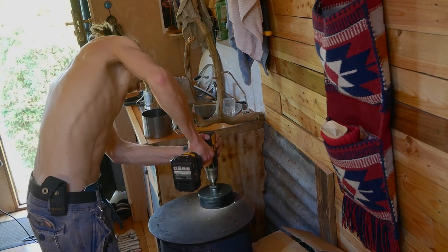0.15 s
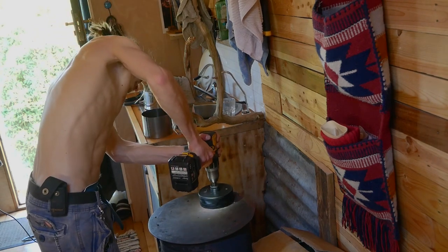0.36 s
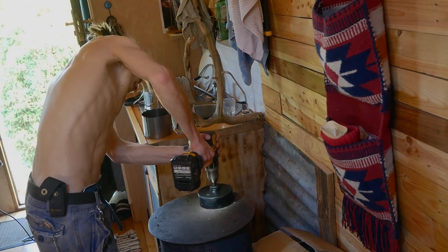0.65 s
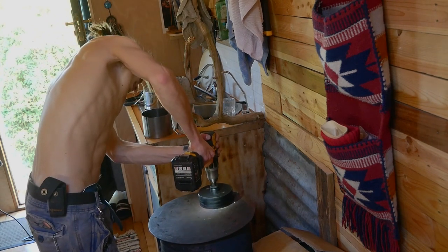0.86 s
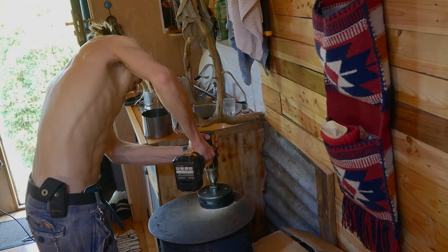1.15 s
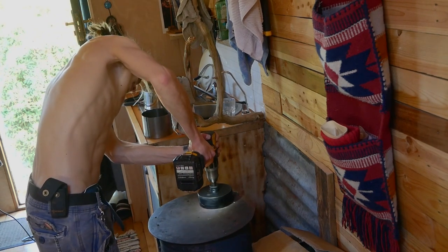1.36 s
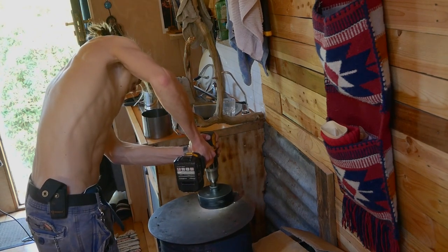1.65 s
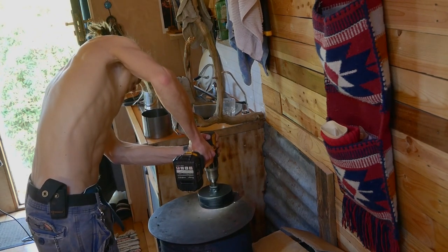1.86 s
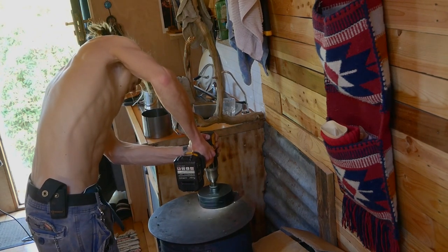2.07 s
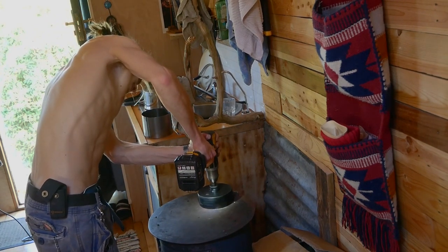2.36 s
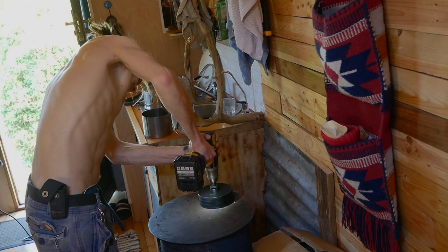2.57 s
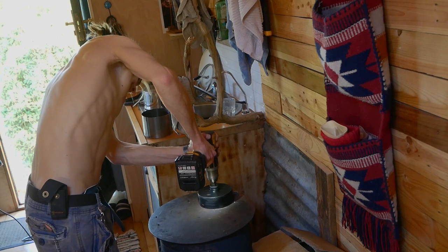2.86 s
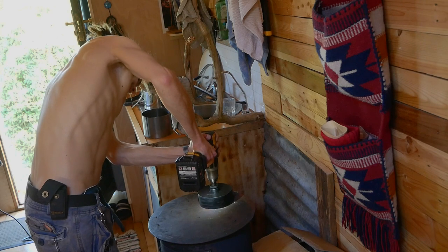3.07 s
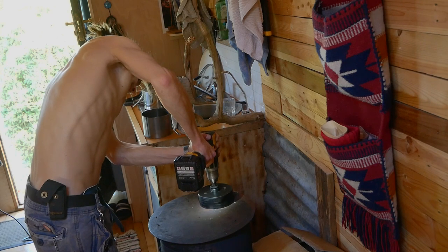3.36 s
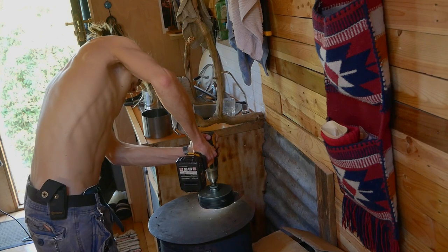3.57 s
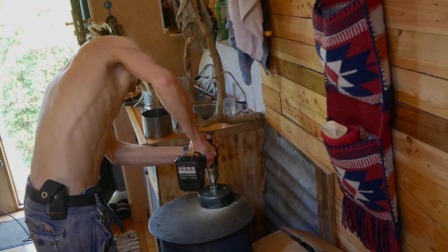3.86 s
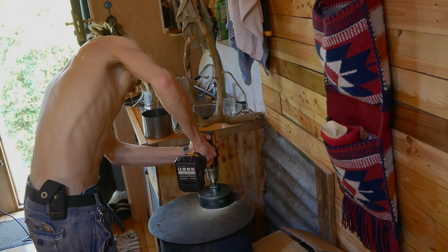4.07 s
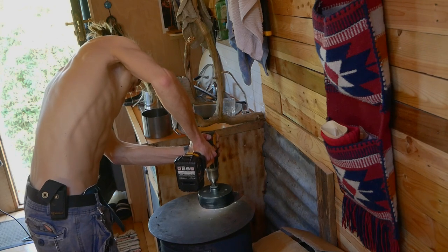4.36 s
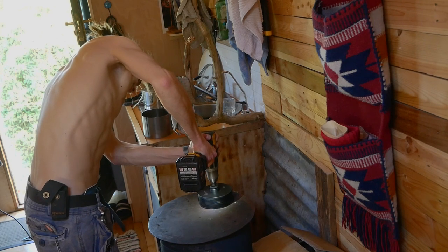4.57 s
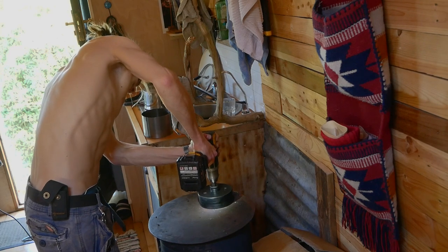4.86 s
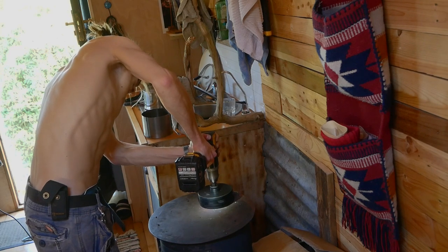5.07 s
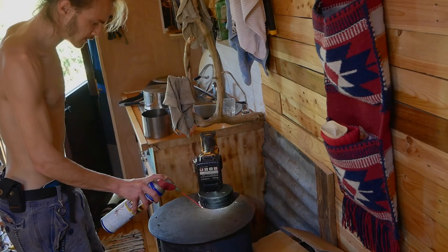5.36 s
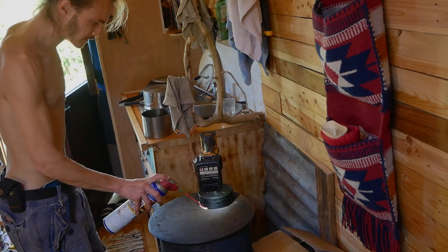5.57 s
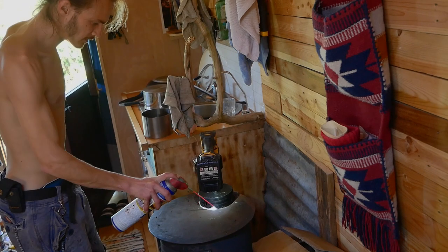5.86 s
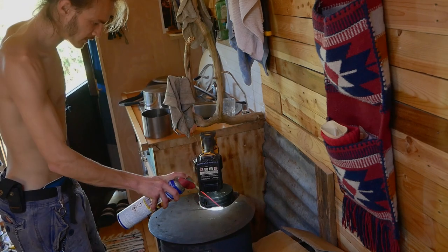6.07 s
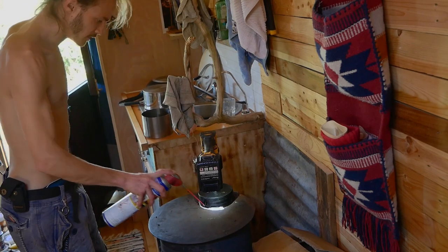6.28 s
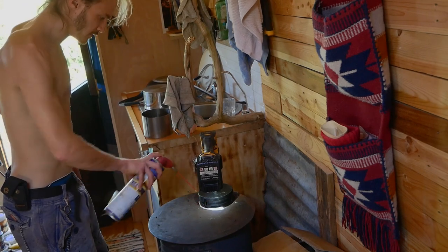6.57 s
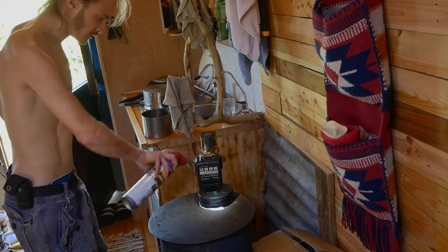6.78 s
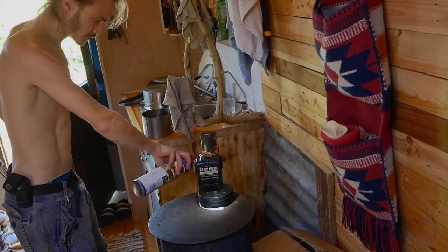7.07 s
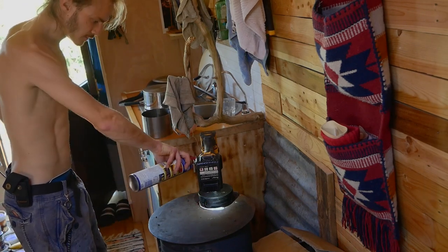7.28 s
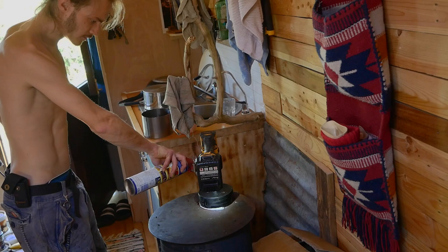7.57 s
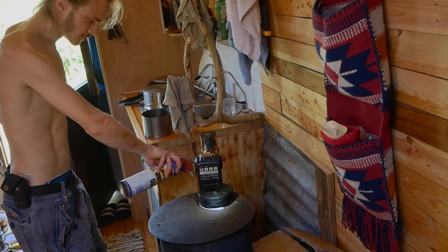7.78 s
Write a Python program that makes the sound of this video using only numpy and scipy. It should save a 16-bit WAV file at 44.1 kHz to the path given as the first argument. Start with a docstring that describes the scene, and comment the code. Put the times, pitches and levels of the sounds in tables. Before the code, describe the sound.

A cordless drill's hole saw grinds loudly through a steel stove top, squealing and chattering, then cuts abruptly to quiet spray hiss and small can clinks.

```python
"""Hole saw in a stove top, then a spray can

A cordless drill drives a hole saw into a steel stove top in a small wooden van. Uneven grains of noise are
the biting teeth; filters make the plate ring, the chips hiss and the stove boom, and single modes squeal.
The scene then jumps to the quiet van: shaped noise makes rumble, air, hand rustle and a dying spray, while
short scrapes ring the modes of an oil spray can as a hand handles it against the saw."""
import sys
import numpy as np
from scipy import signal
from scipy.fft import rfft, irfft, next_fast_len
from scipy.io import wavfile
from scipy.ndimage import uniform_filter1d, map_coordinates

SR = 44100
rng = np.random.default_rng(int(sys.argv[2]) if len(sys.argv) > 2 else 0)


def wav_out(sig):
    """Save sig, one row per channel (or a flat mono array), as 16-bit PCM at SR to the path in sys.argv[1]."""
    wavfile.write(sys.argv[1], SR, np.round(np.clip(np.atleast_2d(sig).T, -1, 1) * 32767).astype(np.int16))


N = 349139
TIME_S = np.arange(N) / SR
JUMP_S = 5.231  # from the drilling to the quiet van

# Modes of the thin can before the hand damps them: (pitch_hz, width_hz, level_db)
CAN_MODES = [(1810, 55, -9), (1980, 70, -7), (2260, 60, -8), (2500, 50, -8), (2910, 45, -4), (3040, 25, 0),
             (3725, 28, -1), (4500, 45, -4), (4750, 53, -8), (5600, 35, -7), (6780, 25, -7),
             (7910, 20, -10), (8110, 24, -7), (9310, 35, -7), (11300, 60, -8), (12600, 90, -8)]
# Broad sound of the steel plate: (pitch_hz, level_db per Hz)
PLATE_SLOPE = [(160, -48), (280, -9), (806, -12.5), (874, -8.5), (1210, -5), (1660, -5), (4500, -16),
               (5850, -46.5), (9900, -120)]
# Ringing modes of the plate, standing on that slope: (pitch_hz, width_hz, level_db)
PLATE_MODES = [(345, 22, 8), (388, 18, 11), (460, 24, 7.5), (510, 18, 8), (581, 20, 11.5), (636, 18, 13),
               (713, 24, 12), (795, 30, 5), (880, 18, 15), (1014, 26, 8), (1187, 20, 6), (1245, 26, 5.5),
               (1330, 170, 3.5), (1500, 36, 6), (1574, 18, 7), (1795, 45, 6), (1962, 36, 6), (2160, 50, 8),
               (2280, 45, 6.5), (2335, 22, 8.5), (2525, 60, 5), (2605, 35, 6), (2820, 45, 4), (2970, 60, 5),
               (3058, 29, 8), (3215, 90, 5)]
# Hiss of the metal chips: (pitch_hz, level_db per Hz)
CHIP_SLOPE = [(2240, -25.5), (3800, -0.5), (4620, -1), (6200, -7), (9590, -10), (12600, -21.5),
              (15200, -26.5), (15700, -38)]
# Ringing modes of the saw cup, standing on that hiss: (pitch_hz, width_hz, level_db)
CUP_MODES = [(4600, 610, 1), (7240, 620, 1.5), (9460, 190, 1.5), (11360, 390, 4.5), (12240, 360, 6.5)]
# Drum-like sound of the stove body: (pitch_hz, level_db per Hz)
DRUM_SLOPE = [(70, -42), (95, -7), (130, -1), (152, 4.5), (180, -1.5), (260, -6.5), (380, -12.5),
              (520, -41)]


def amp(db):
    """Turn decibels into a plain gain."""
    return 10 ** (np.asarray(db) / 20)


def unit(x):
    """Scale a signal to an RMS of one."""
    return x / np.sqrt(np.mean(x ** 2) + 1e-20)


def along(points, hz):
    """Read a curve of (pitch_hz, value) points on a logarithmic pitch axis."""
    f, v = np.transpose(points)
    return np.interp(np.log(hz + 1), np.log(f + 1), v)


def curves(rows):
    """Draw each column after the time as a curve with one value per sample."""
    s, *cols = np.transpose(rows)
    return [np.interp(TIME_S, s, c) for c in cols]


def wobble(rate):
    """Make a smooth random curve with rate knots a second."""
    knots = rng.standard_normal(int(N * rate / SR) + 4)
    return map_coordinates(knots, [np.arange(N) * rate / SR])


def coloured(x, gain):
    """Filter x to a gain over pitch, causally: nothing sounds before its cause."""
    m = 2 * next_fast_len(N // 2 + 8192)
    cep = irfft(np.log(gain(np.fft.rfftfreq(m, 1 / SR)) + 1e-6), m)
    # folding the cepstrum forward gives the filter its minimum phase
    cep[1:m // 2] *= 2
    cep[m // 2 + 1:] = 0
    return irfft(rfft(x, m) * np.exp(rfft(cep)), m)[..., :N]


def body(slope, modes=()):
    """Give the gain of a broad spectrum with resonant peaks standing on it."""
    def peaks(hz):
        return sum(amp(2 * db) / (1 + (2 * (hz - c) / w) ** 2) for c, w, db in modes)
    return lambda hz: amp(along(slope, hz)) * np.sqrt(1 + peaks(hz))


def noise():
    """Make plain white noise."""
    return rng.standard_normal(N)


def grains(rate, spread_db, hiss):
    """Make random impacts of uneven size, rate a second, over a share of smooth hiss."""
    sizes = amp(spread_db * rng.exponential(size=N))
    hits = (rng.random(N) < rate / SR) * noise() * sizes
    return unit(hits) + hiss * noise()


def narrow(hz, width_hz):
    """Keep a mode ringing with random pushes: a tone of wandering size and phase."""
    turns = np.exp(2j * np.pi * np.cumsum(hz * np.ones(N)) / SR)
    swing = (wobble(width_hz) + 1j * wobble(width_hz)) * turns
    return unit(swing.real)


def patchy(x, depth_db, size=256, count=12):
    """Vary the gain in patches of time and pitch; a larger size makes them narrower in pitch."""
    z = signal.stft(x, nperseg=size)[2]
    field = uniform_filter1d(rng.standard_normal(z.shape), size=4, axis=0)
    field = uniform_filter1d(field, size=count, axis=1)
    return signal.istft(z * amp(depth_db * unit(field)), nperseg=size)[1][:N]


def van_background():
    """Shape noise into low rumble, wavering hum from outside, still air and a faint airy whistle."""
    # low rumble: (pitch_hz, level_db per Hz)
    rumble_slope = [(15, -4.5), (30, 0.5), (55, -1.5), (70, -9.5), (120, -8.5), (326, -19.5), (1200, -31),
                    (1800, -59)]
    # wavering hum: (pitch_hz, width_hz, level_db)
    hum_tones = [(95.5, 10, -53), (151, 12, -66)]
    # still air: (pitch_hz, level_db per Hz)
    air_slope = [(180, -15), (300, -2), (1120, -8), (1440, -4), (1730, -8.5), (15600, -29)]
    # one airy tone: middle_s, length_s, pitch_hz, level_db
    whistle_tone = (6.58, .16, 1460, -66)
    rumble = amp(-49.5 + 1.25 * wobble(4)) * unit(coloured(noise(), body(rumble_slope)))
    hum = sum(amp(db) * narrow(hz, width) for hz, width, db in hum_tones)
    air = amp(-64) * unit(coloured(noise(), body(air_slope)))
    middle_s, length_s, hz, db = whistle_tone
    swell = np.exp(-((TIME_S - middle_s) / length_s) ** 2)
    whistle = amp(db) * swell * narrow(hz, width_hz=250)
    return rumble + hum + air + whistle


def thud():
    """Step softly on the floor: one low push through the boards with two quicker overtones."""
    # the step: start_s, pitch_hz, lowest tone's unscaled 60 dB fade_s, level_db before overtone scaling
    step = (5.385, 48, .3, -43)
    start_s, hz, fade_s, db = step
    t = np.maximum(TIME_S - start_s, 0)
    tones = 0
    for k in (1, 3.1, 5.2):
        fade = amp(-60 * t * k ** 0.46 / fade_s - 1.8 * k)
        tones = tones + fade * np.sin(2 * np.pi * k * hz * t)
    return amp(db) * tones


def spray():
    """Hiss out of the nozzle, ring the can faintly, sink in pitch and die away after the jump."""
    # hiss of the jet: (pitch_hz, level_db per Hz)
    jet_slope = [(1800, -29), (3500, -2), (6000, 1), (9500, -2.5), (15600, -10.5)]
    # airy nozzle note: pitch_hz at the jump, sinking_hz per s, width_hz, level_db against the spray
    nozzle_note = (9400, 2100, 700, -12)
    start_db, fade_db_per_s = -52, 15
    spray_db = start_db - fade_db_per_s * np.maximum(TIME_S - JUMP_S, 0)
    jet_modes = [(hz, width, db + 9) for hz, width, db in CAN_MODES]
    jet = amp(spray_db) * unit(coloured(noise(), body(jet_slope, jet_modes)))
    note_hz, sinks, width, note_db = nozzle_note
    note = amp(spray_db + note_db) * narrow(note_hz - sinks * (TIME_S - JUMP_S), width)
    return jet + note


def rustle():
    """Rub a hand over the can: patchy grains colour themselves through its damped modes."""
    # strength of the rub, for its low and its treble part alike: (start_s, level_db)
    hand_level = [(5.24, -55.5), (5.5, -62.5), (5.68, -54), (5.75, -67.5), (5.83, -54.5), (5.92, -67.5),
                  (6.15, -62), (6.4, -69.5), (6.8, -69.5), (7.1, -62.5), (7.55, -68), (7.66, -58.5),
                  (7.75, -59), (7.92, -46.5)]
    # colour of the rub: (pitch_hz, level_db per Hz)
    rub_slope = [(600, -19.5), (1000, -10), (1500, -17.5), (2100, -4.5), (2500, -12.5), (4500, -3),
                 (6000, -8.5), (7800, -6.5), (10000, -11.5), (15600, -16)]
    rustle_db, = curves(hand_level)
    # the hand that holds the can widens its modes
    held_modes = [(hz, 1.5 * width, db + 5) for hz, width, db in CAN_MODES]
    rub = patchy(grains(3000, spread_db=1.2, hiss=1.0), depth_db=3.5)
    rub = coloured(rub, body(rub_slope, held_modes))
    low = coloured(rub, lambda hz: 1 / np.sqrt(1 + (hz / 4000) ** 6))
    return amp(rustle_db) * (unit(low) + unit(rub - low))


def can():
    """Touch metal with can and straw: each short scrape also rings the can's modes at new strengths."""
    # touches, levels before colouring: (start_s, level_db, rise_ms, ring_db against scrape, strongest_hz)
    touches = [(5.292, -35.5, 1.7, -3, 1980), (5.31, -53.5, 3, -7.5, 2980), (6.079, -44, 1, -12, 2000),
               (6.118, -47.5, 1, -7, 4900), (6.231, -37, 0.54, -7, 2010), (6.254, -43, 1.3, 5.5, 9300),
               (6.34, -49, 1.1, -10, 4500), (6.408, -34, 0.27, -8, 4660), (6.68, -51, 8, -9, 4470),
               (6.955, -47, 12, -13, 5400), (7.04, -55.5, 12, -1, 8000), (7.058, -46.5, 9.1, -3, 3750),
               (7.075, -45.5, 11, -3, 2400), (7.085, -60.5, 14, 4, 7600), (7.095, -51, 7.3, -10, 2000),
               (7.19, -48, 8, -16, 1900), (7.25, -48, 5, -16, 2000), (7.275, -49, 8, -10, 1850),
               (7.362, -47, 2.2, -13, 2470), (7.6, -37, 4.3, -10, 4500), (7.625, -43, 7.1, -14, 3000),
               (7.78, -36, .6, -2, 1900), (7.799, -38.5, .8, -3.5, 2900), (7.823, -41.5, 1, -4.5, 5000),
               (7.848, -39.5, .6, -5, 1900), (7.88, -39.5, .6, 0.5, 4500), (7.902, -44.5, 4, -0.5, 3100)]
    # colour of the scrape itself: (pitch_hz, level_db per Hz)
    scrape_slope = [(410, -38), (700, -9), (1260, -4.5), (1880, -3.5), (4650, -12.5), (8570, -12),
                    (13000, -21), (15600, -26)]
    shortest_fade_s, slow_tails = 0.089, 6  # the 60 dB fade grows by this many rise times
    brightens_db = 1.5  # tilt per octave, for each octave of the strongest pitch
    grip = 0.5  # the fingers widen each mode by up to this share
    ring_dulls_db = 3.5  # per octave: the hand damps the high modes
    slide_frees_db = 0.3  # per ms of rise: a slide frees the high modes and hisses less
    out, t = np.zeros(N + SR), np.arange(SR // 3) / SR
    hz = np.fft.rfftfreq(len(t), 1 / SR)
    grit = unit(np.resize(grains(6000, spread_db=0.7, hiss=1.4), N + SR))
    for start_s, db, rise_ms, ring_db, spot_hz in touches:
        start, rise_s = round(start_s * SR), rise_ms / 1000
        fade_s = shortest_fade_s + slow_tails * rise_s
        fade = amp(db - 60 * np.maximum(t - rise_s, 0) / fade_s)
        attack = np.minimum(t / rise_s, 1)
        scrape = rfft(fade * attack * grit[start:][:len(t)], len(t))
        modes = 0
        for c, width, level_db in CAN_MODES:
            dull_db = (ring_dulls_db - slide_frees_db * rise_ms) * np.log2(c / 3000)
            strength = amp(level_db + rng.normal(0, 1.9) - dull_db)
            held_width = width * (1 + grip * rng.random())
            modes = modes + strength * 1j * hz * width / (c * c - hz * hz + 1j * hz * held_width)
        # where the can is touched favours one band
        spot = np.exp(-(np.log2((hz + 100) / spot_hz) / 0.2) ** 2)
        bright_db = brightens_db * np.log2(spot_hz / 3200)
        tilt = amp(bright_db * np.log2((hz + 100) / 3000) + 5.1 * spot)
        direct = amp(along(scrape_slope, hz) - slide_frees_db * rise_ms * (0.5 - spot))
        ring = amp(ring_db + 9.5 + 2.9 * spot) * modes
        out[start:][:len(t)] += irfft(scrape * tilt * (direct + ring), len(t))
    return out[:N]


def catches():
    """Let a caught tooth go: a short burst through the plate, the saw cup and the stove drum."""
    # caught teeth, levels before lift and filters: (start_s, level_db, saw cup level_db against plate)
    caught_teeth = [(0.0744, -12.5, -19.5), (0.097, -15, -4.5), (0.5139, -1.5, -44), (0.9091, -10, -15.5),
                    (1.2102, -6.5, -7), (4.124, -19, -15), (4.5228, -7, -13.5), (5.126, -4.5, -14.5)]
    fade_s = 0.045  # time to fall 60 dB
    low, high, t = np.zeros(N + SR), np.zeros(N + SR), np.arange(SR // 10) / SR
    for start_s, db, cup_db in caught_teeth:
        start = round(start_s * SR)
        burst = amp(db + 5.5 - 60 * t / fade_s) * rng.standard_normal(len(t))
        low[start:][:len(t)] += burst
        high[start:][:len(t)] += amp(cup_db) * burst
    plate, drum = body(PLATE_SLOPE, PLATE_MODES), body(DRUM_SLOPE)
    stove = coloured(low[:N], lambda hz: plate(hz) + amp(-5) * drum(hz))
    return stove + coloured(high[:N], body(CHIP_SLOPE, CUP_MODES))


def squeals():
    """Bind the saw so one plate mode sings: a quick swell, sinking as the saw drags, part tone, part rasp."""
    # single squeals: (middle_s, length_s, pitch_hz at the middle before drift, level_db)
    squeal_list = [(0.098, 0.007, 4430, -10.5), (0.144, 0.045, 907, -19.5), (0.294, 0.057, 252, -21.5),
                   (0.69, 0.04, 1200, -19), (0.737, 0.05, 1220, -18.5), (0.93, 0.06, 1210, -20.5),
                   (1.19, .04, 1200, -24), (0.845, 0.05, 254, -17.5), (1.395, 0.042, 1212, -19),
                   (1.533, 0.045, 276, -17), (1.624, 0.035, 1224, -20.5), (1.758, 0.057, 1182, -20.5),
                   (1.841, 0.043, 882, -22), (2.099, 0.038, 897, -17), (2.403, 0.046, 1246, -15),
                   (2.499, 0.04, 1240, -21.5), (2.6, 0.05, 882, -20.5), (2.616, 0.035, 1200, -21.5),
                   (2.743, 0.045, 880, -19), (2.834, 0.06, 1240, -25), (2.957, 0.04, 418.5, -17),
                   (2.99, 0.052, 341, -18.5), (3.178, 0.034, 1225, -22), (3.439, 0.055, 1179, -17),
                   (3.71, 0.035, 1195, -16.5), (3.927, 0.06, 1220, -17), (4.146, 0.038, 890, -17),
                   (4.391, 0.034, 434, -16.5), (4.422, 0.031, 1173, -13.5), (4.524, 0.022, 1307, -14),
                   (4.684, 0.033, 1180, -17.5), (4.721, 0.03, 412, -19.5), (4.887, 0.09, 1264, -13)]
    out, drift = np.zeros(N), 0.01 * wobble(40)
    slow_rasp = 0.6 * (wobble(70) + 1j * wobble(70))
    fast_rasp = 0.45 * (wobble(260) + 1j * wobble(260))
    rasp = 1 + slow_rasp + fast_rasp
    for middle_s, length_s, hz, db in squeal_list:
        first = max(round((middle_s - length_s) * SR), 0)
        span = slice(first, round((middle_s + 1.5 * length_s) * SR))
        u = (TIME_S[span] - middle_s) / length_s
        swell = np.exp(-np.where(u < 0, 7, 4) * u ** 2)
        # the rasp adds no strength
        held = np.sqrt(np.sum(swell ** 2) / np.sum(np.abs(swell * rasp[span]) ** 2))
        pitch_hz = hz * (1 + drift[span] - 0.023 * u)
        tone = rasp[span] * np.exp(2j * np.pi * np.cumsum(pitch_hz) / SR)
        out[span] += amp(db) * held * swell * tone.imag
    return out


def binds():
    """Let the cut surge as teeth dig in and lull as they run light; the result is in dB."""
    # teeth dig in: (peak_s, height_db)
    surge_list = [(.18, 2.5), (.3, 1.5), (0.419, 3), (.69, 2.5), (.845, 1.5), (.92, 1), (1.075, 2),
                  (1.19, 1), (1.29, 3), (1.53, 2), (1.64, 3.5), (1.845, 2), (2.25, 2.5), (2.4, 1.5),
                  (2.495, 3), (2.61, 2.5), (2.98, 2), (3.175, 2.5), (3.29, 2.5), (3.715, 3), (3.924, 1),
                  (4.13, 2.5), (4.39, 1.5), (4.74, 2)]
    # teeth run light: (middle_s, depth_db)
    lull_list = [(.55, 2), (.585, 3.5), (.806, 4.5), (1.43, 3), (1.61, 2.5), (2.556, 2.5), (3.33, 3.5),
                 (3.37, 1), (4.502, 2.5), (4.585, 3)]
    rise_s, fall_s, lull_s = 0.011, 0.026, 0.017  # half lengths
    t = np.arange(0, JUMP_S, 0.002)
    surges = sum(db * np.exp(-((t - s) / np.where(t < s, rise_s, fall_s)) ** 2) for s, db in surge_list)
    lulls = sum(db * np.exp(-((t - s) / lull_s) ** 2) for s, db in lull_list)
    return np.interp(TIME_S, t, surges - lulls)


def saw():
    """Strike the plate with teeth in clumps: plate rings and chatters, chips hiss in the cup, stove booms."""
    # steady load of the cut, before surges and trim: (start_s, plate level_db)
    load = [(0.0, -24.5), (0.071, -23), (0.076, -19), (0.45, -19.5), (1.0, -20), (1.35, -19), (2.0, -19),
            (2.45, -19), (3.6, -20), (4.3, -19), (5.226, -19.5)]
    # the stove settles under the load, before lift and swings: (start_s, deep boom level_db, drum level_db)
    stove_levels = [(0.0, -31.5, -19.5), (0.15, -31.5, -24), (1.3, -31.5, -26.5), (3.7, -36.5, -30),
                    (4.8, -37.5, -29), (5.226, -35.5, -26.5)]
    # deep boom of the stove: (pitch_hz, level_db per Hz)
    boom_slope = [(20, -23.5), (38, -7.5), (48, -4), (57, 4.5), (66, -3.5), (82, -16), (110, -56)]
    chip_db = -29  # chip hiss at the middle load
    drum_follows, chatter_follows = 1.08, 0.47  # share of surges in the drum; extra share in the chatter
    load_db, = curves(load)
    plate_db = load_db + binds() + 0.53 * wobble(14)
    boom_db, drum_db = curves(stove_levels)
    # the cut tightens and frees around its half-second average
    surge_db = plate_db - uniform_filter1d(plate_db, size=SR // 2)

    clumps = amp(0.15 * wobble(35) + 0.87 * wobble(90))
    bites = patchy(clumps * grains(6000, spread_db=1.5, hiss=0.96), depth_db=1.13)
    bites = patchy(bites, depth_db=1.8, size=2048, count=2)  # single modes flare up and fade
    swarf = patchy(clumps * grains(6000, spread_db=0.0, hiss=1.0), depth_db=1.5)

    plate = amp(plate_db - 0.26) * unit(coloured(bites, body(PLATE_SLOPE, PLATE_MODES)))
    chip_level_db = chip_db + plate_db - np.median(load_db[:round(JUMP_S * SR)])
    chips = amp(chip_level_db) * unit(coloured(swarf, body(CHIP_SLOPE, CUP_MODES)))
    boom = amp(boom_db + 3) * unit(coloured(noise(), body(boom_slope)))
    drum_level_db = drum_db + drum_follows * surge_db + 0.46 * wobble(1.9)
    drum = amp(drum_level_db) * unit(coloured(bites, body(DRUM_SLOPE)))
    # the teeth chatter near one plate mode, at a wandering pitch
    chatter_db = plate_db - 13.5 + chatter_follows * surge_db + 1.5 * wobble(18)
    chatter = amp(chatter_db) * narrow(1235 + 38 * wobble(9), width_hz=40)
    return plate + chips + boom + drum + chatter


def scene():
    """Join two moments of the van by a hard jump; a weak side signal, the middle in random phases, adds width."""
    # side level against the middle, before its 2 dB lift: (pitch_hz, level_db)
    side_slope = [(60, -26), (250, -28.5), (500, -24), (1200, -31.5), (2400, -24.5), (5000, -19.5),
                  (9000, -17), (15000, -17)]
    before = np.clip((JUMP_S - TIME_S) / 0.004 + 0.5, 0, 1)  # a 4 ms crossing
    drilling = saw() + squeals() + catches()
    quiet_van = van_background() + rustle() + spray() + can() + thud()
    mid = before * drilling + (1 - before) * quiet_van
    z = signal.stft(mid, nperseg=256)[2]
    random_phase = np.exp(2j * np.pi * rng.random(z.shape))
    side_noise = signal.istft(z * random_phase, nperseg=256)[1][:N]
    side = amp(2) * coloured(patchy(side_noise, depth_db=3.5), body(side_slope))
    return np.array([mid + side, mid - side]) * amp([[-0.05], [0.05]])


def record(dry):
    """Add each microphone's own hiss, round off the highest peaks and drop all above the band limit."""
    hiss_db, top_hz = -66, 15600  # hiss before its gentle treble slope
    hiss = coloured(rng.standard_normal(dry.shape), lambda hz: (1 + hz / 1000) ** -0.25)
    dry = dry + amp(hiss_db) * hiss
    soft = dry / (1 + np.abs(dry / 0.85) ** 4) ** (1 / 4)
    m = next_fast_len(N + 8192)
    keep_band = np.fft.rfftfreq(m, 1 / SR) < top_hz
    return irfft(rfft(soft, m) * keep_band, m)[:, :N]


dry = scene()
out = record(dry)
wav_out(out)
```